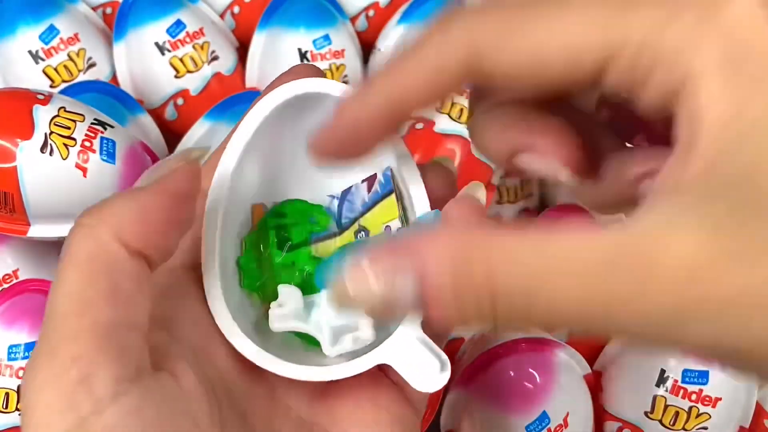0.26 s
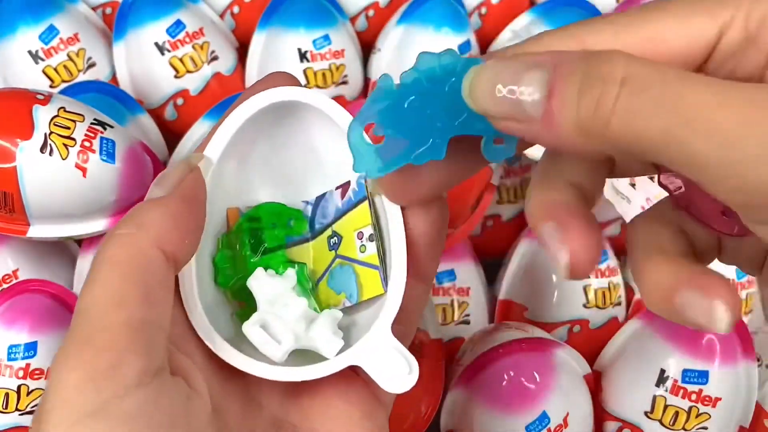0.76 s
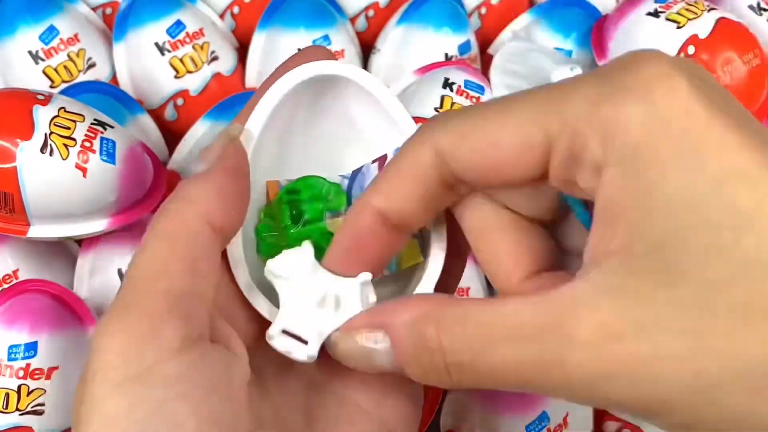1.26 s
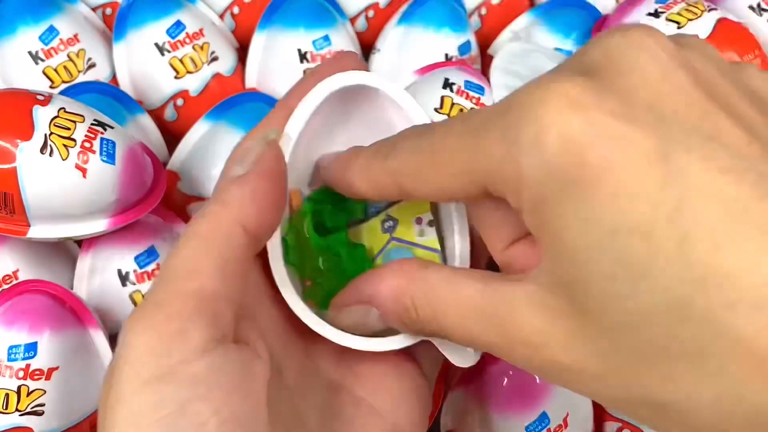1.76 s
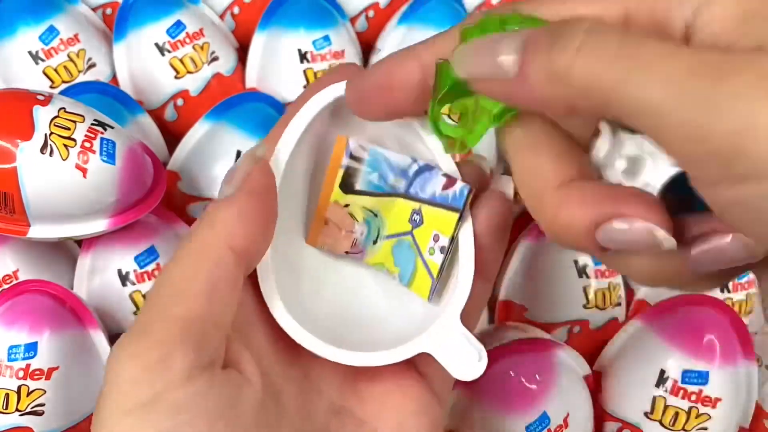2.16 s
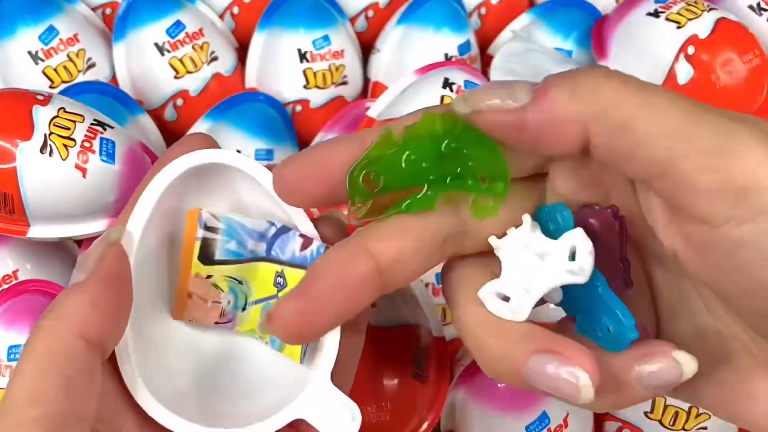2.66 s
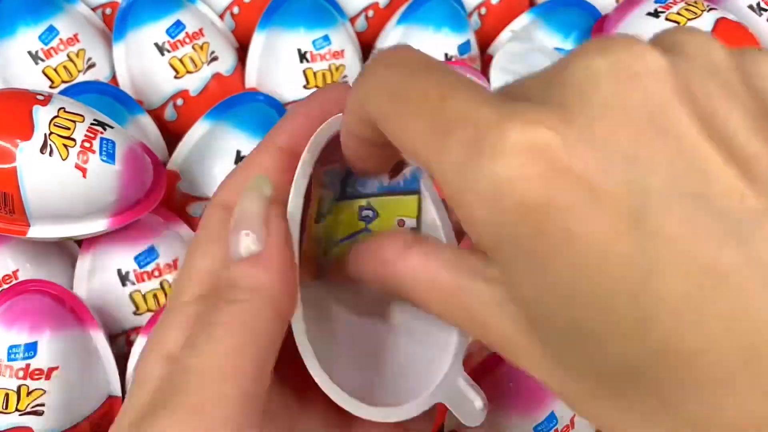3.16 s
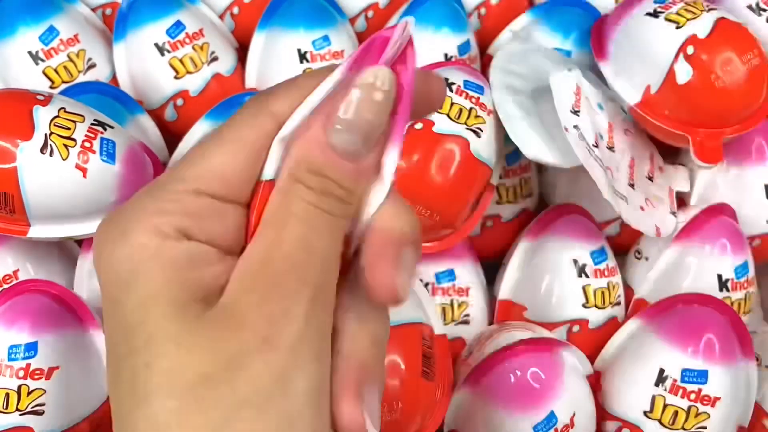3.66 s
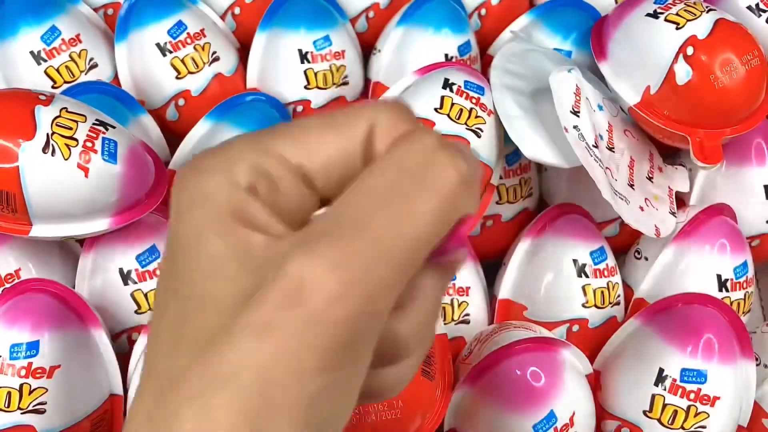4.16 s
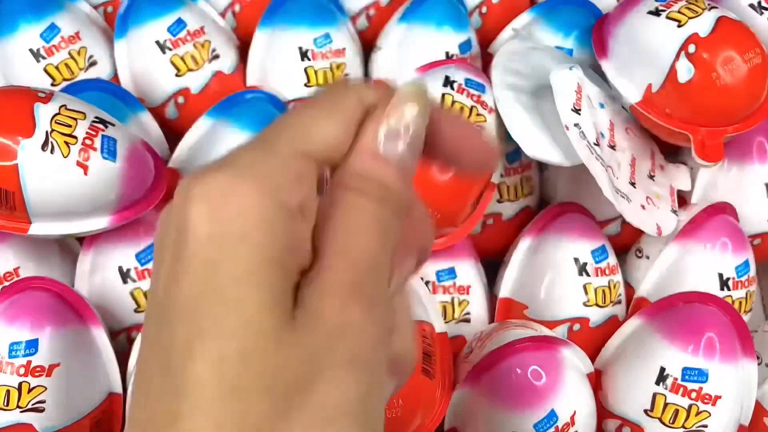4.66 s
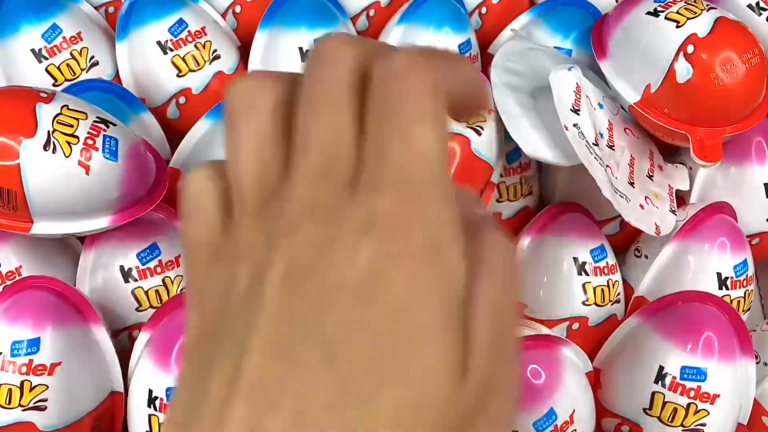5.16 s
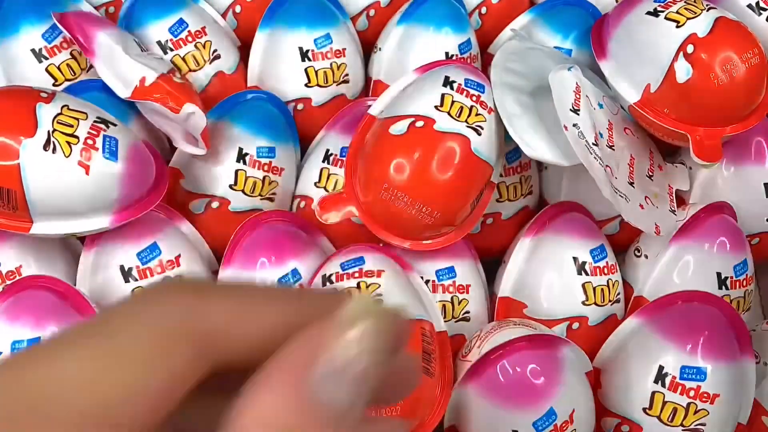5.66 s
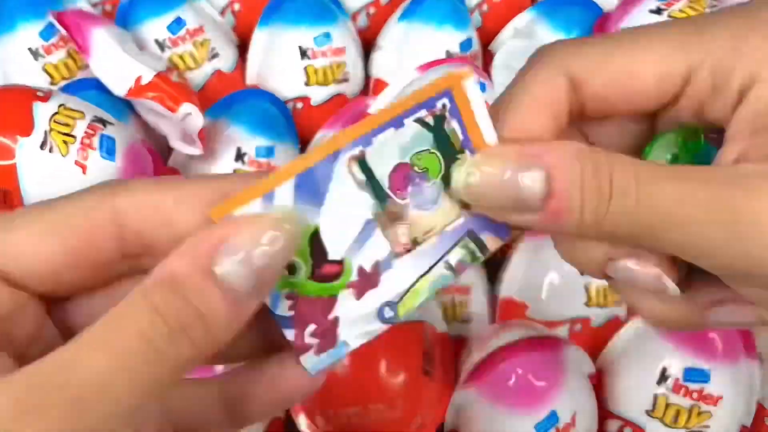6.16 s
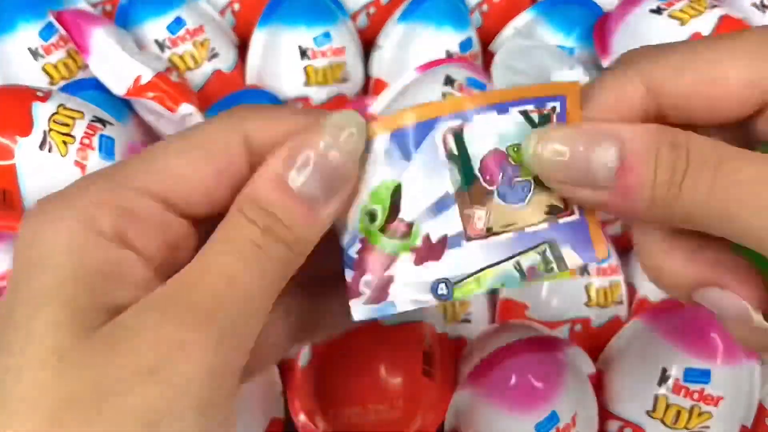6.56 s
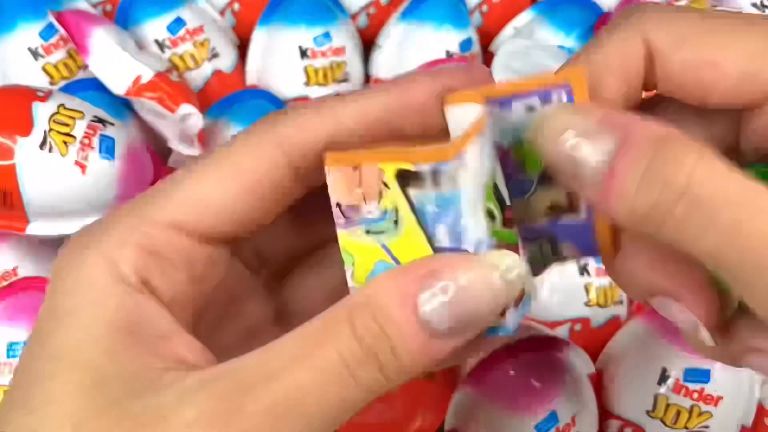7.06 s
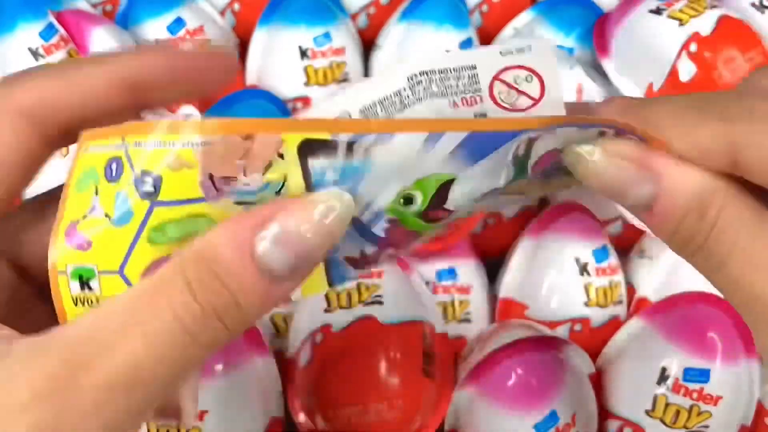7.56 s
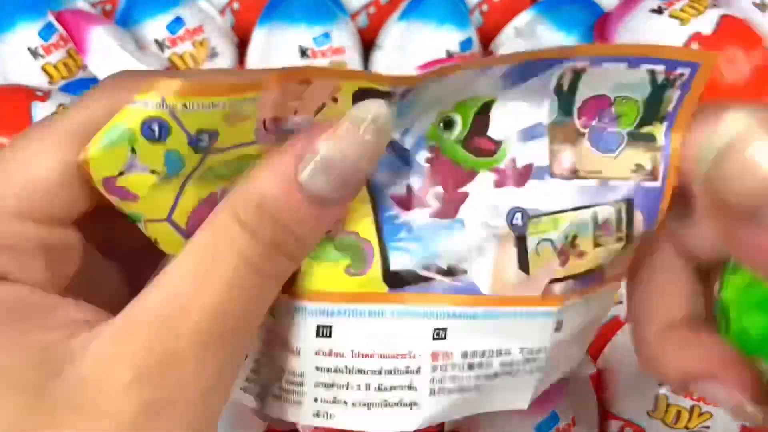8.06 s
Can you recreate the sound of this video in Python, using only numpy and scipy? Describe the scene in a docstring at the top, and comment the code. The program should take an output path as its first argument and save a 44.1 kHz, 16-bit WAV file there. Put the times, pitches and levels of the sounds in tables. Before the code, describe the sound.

Quiet plastic clicks and skin rubbing come first, with one sharper knock as little pieces leave a thin cup. A short papery rustle leads into bright cracks, pops and stuttering creaks as the cup is bent, then a hollow, clattery landing on other plastic shells. Dry paper crackles follow, sparse at first, then busier with soft flapping thumps. Close, dry indoor sound with faint room tone and low rumble.

```python
"""In a small room, close to the microphone, fingers pick little plastic toy parts out of a thin plastic egg half.
The empty half is squeezed until it creaks and snaps, then dropped among other eggs; a folded leaflet is opened.
Each contact is a dull knock, a short ring and a bright crack, all set off by a push and its fine chatter.
Between them skin, plastic and paper rub as coloured grains and hiss; soft puffs are damped low swings.
A short diffuse room tail, steady room tone and a low rumble lie behind."""
import sys
import numpy as np
from scipy import signal
from scipy.fft import rfft, irfft, next_fast_len
from scipy.io import wavfile

SR = 44100
rng = np.random.default_rng(int(sys.argv[2]) if len(sys.argv) > 2 else 0)


def to_wav(sig):
    """Store sig (one row per channel, or 1-D mono) as 16-bit WAV at the path in sys.argv[1].

    Samples outside -1..1 are clipped; the rate is SR.
    """
    pcm = np.clip(np.atleast_2d(sig), -1, 1) * 32767
    pcm = np.round(pcm).astype(np.int16)
    wavfile.write(sys.argv[1], SR, pcm.T)  # frames by channels


N = 366471
TIME = np.arange(N) / SR
CONTACT_TIME = np.arange(1024) / SR
CUTOFF_HZ = 16000
LEVEL_WINDOW_S = 0.005   # burst levels are stated as rms over this span

# colours of bending, scraping and hissing surfaces: pitch_hz, density_db (relative, per Hz)
BENDING_COLOUR = [(60, 3), (110, 2), (190, -0.5), (330, -6), (600, -0.5), (1100, -3.5), (1600, -15)]
SCRAPING_COLOUR = [(800, -17), (1250, -2), (2100, -1.5), (2900, -0.5), (3900, -16.5), (5200, -18.5)]
HISSING_COLOUR = [(2800, -10), (4400, -5), (5400, -5), (6500, -5.5), (9800, -0.5), (12500, -1),
                  (16000, -8.5)]


def from_db(db):
    """Decibels to gain."""
    return 10 ** (np.asarray(db) / 20)


def rms_one(x):
    """Scale to unit rms."""
    return x / np.sqrt(np.mean(x ** 2) + 1e-20)


def unit_burst(x):
    """Scale a burst to the energy of unit rms over the level window."""
    return x * np.sqrt(LEVEL_WINDOW_S * SR / (np.sum(x ** 2) + 1e-20))


def in_time(rows):
    """Each column of a curve at every sample."""
    s, *columns = np.transpose(rows)
    return [np.interp(TIME, s, column) for column in columns]


def at_hz(points, hz):
    """Read a table on a log-frequency axis."""
    f, value = np.transpose(points)
    return np.interp(np.log(hz + 1), np.log(f), value)


def colour(x, points):
    """Minimum-phase filter with the given spectrum, falling 20 dB an octave for two octaves past its ends."""
    size = next_fast_len(len(x) + 2048, True)
    hz = np.fft.rfftfreq(size, 1 / SR) + 1
    octaves_outside = np.abs(np.log2(hz / np.clip(hz, points[0][0], points[-1][0])))
    level_db = at_hz(points, hz) - 20 * np.minimum(octaves_outside, 2)
    # folding the cepstrum onto positive time makes the filter causal
    cepstrum = irfft(np.log(from_db(level_db)), size)
    cepstrum[1:size // 2] *= 2
    cepstrum[size // 2 + 1:] = 0
    response = np.exp(rfft(cepstrum))
    return irfft(rfft(x, size) * response, size)[:len(x)]


def ring(x, hz, t60):
    """One damped mode that falls 60 dB in t60 seconds."""
    r = 1000 ** (-1 / (t60 * SR))
    w = 2 * np.pi * hz / SR
    return signal.lfilter([1, 0, -1], [1, -2 * r * np.cos(w), r * r], x)


def soften(x, hz):
    """Second-order low-pass."""
    return signal.sosfilt(signal.butter(2, min(hz, SR / 2 - 1), fs=SR, output="sos"), x)


def add(out, s, sound):
    """Mix a sound in at a time."""
    i = int(np.clip(round(s * SR), 0, N - 1))
    out[i:i + len(sound)] += sound[:N - i]


def drift(per_s):
    """Smooth random wandering of unit rms."""
    knots = rng.standard_normal(4096)
    return rms_one(np.interp(TIME * per_s, np.arange(len(knots)), knots))


def contacts(rows, chatter, chatter_s, crack_s, knock_hz, knock_t60, lowest_hz):
    """A sudden push, then a few milliseconds of fine chatter while the surfaces settle."""
    # spectrum of the bright crack: pitch_hz, density_db (relative, per Hz)
    crack_colour = [(1500, -7), (3200, -5.5), (4600, 1), (6500, -4), (10000, 1), (13000, -4), (16000, -9)]
    # a second mode that rings half as long: times the ring's pitch, level [dB]
    overtone_ratio, overtone_db = 1.937, -14
    out, t = np.zeros(N), CONTACT_TIME
    # a small object hardly radiates its lowest frequencies
    low_cut = signal.butter(2, lowest_hz, "high", fs=SR, output="sos")
    for s, knock_db, ring_db, ring_hz, ring_t60, crack_db in rows:
        chatter_noise, crack_noise, grip_noise = rng.standard_normal((3, len(t)))
        settle = chatter * unit_burst(chatter_noise * np.exp(-(t / chatter_s) ** 2))
        impulse = unit_burst(1.0 * (t == 0))
        push = signal.sosfilt(low_cut, impulse + 0.93 * settle)

        # the grip changes the pitch of the knock from one touch to the next
        gripped_hz = knock_hz * np.exp(0.12 * grip_noise[0])
        knock = soften(ring(push, gripped_hz, knock_t60), 2300)

        main_mode = soften(ring(push, ring_hz, ring_t60), 1.2 * ring_hz)
        overtone = ring(push, min(overtone_ratio * ring_hz, CUTOFF_HZ), ring_t60 / 2)
        tone = unit_burst(main_mode) + from_db(overtone_db) * unit_burst(overtone)

        crack = colour(unit_burst(crack_noise * np.exp(-t / crack_s)) + settle, crack_colour)

        hit = from_db(knock_db) * unit_burst(knock)
        hit += from_db(ring_db) * unit_burst(tone)
        hit += from_db(crack_db) * unit_burst(crack)
        add(out, s, hit)
    return out


def toy_clinks():
    """Hard little toy parts touch: short high rings and cracks with almost no knock."""
    # touches, levels over 5 ms: start_s, ring_db, ring_hz, crack_db
    touches = [(0.953, -41, 4480, -40.5), (0.9653, -40, 9800, -35.5), (0.98, -38, 8900, -44),
               (1.546, -40.5, 10560, -46), (1.5642, -59, 3140, -55), (1.578, -36.5, 9630, -44.5),
               (1.606, -51, 9500, -53), (1.6432, -50, 8300, -50), (1.6598, -51, 6000, -51.5),
               (2.8213, -56, 3420, -57.5), (2.8445, -67, 9050, -50.5), (2.8903, -47, 11050, -66),
               (5.6651, -45.5, 7900, -41), (5.7124, -51, 2920, -61)]
    # too light to knock much, however hard they meet
    knock_db, ring_t60 = -67, 0.0061
    rows = [(s, knock_db, ring_db, hz, ring_t60, crack_db) for s, ring_db, hz, crack_db in touches]
    return contacts(rows, chatter=1.0, chatter_s=0.0032, crack_s=0.00017,
                    knock_hz=735, knock_t60=0.0021, lowest_hz=350)


def cup_snaps():
    """The thin cup is knocked or buckles; the grip sets the pitch and damping of its ring."""
    # snaps, levels over 5 ms: start_s, knock_db, ring_db, ring_hz, ring_t60_s, crack_db
    snaps = [(0.3176, -51, -46, 1890, .002, -53), (0.3479, -37, -48, 1540, .014, -41),
             (0.3816, -66, -42, 1800, .005, -45), (0.3941, -69, -45, 1660, .002, -42.5),
             (0.636, -66, -75, 1800, .004, -68), (1.1173, -57, -53, 1760, .005, -55),
             (1.1749, -52, -40.5, 2150, .002, -41), (1.2661, -39.5, -27.5, 2260, .004, -22.5),
             (1.7175, -59, -53, 1960, .003, -58.5), (1.7685, -70, -66, 2000, .004, -62),
             (1.8223, -46.5, -51, 1720, .002, -50), (2.3785, -81, -74.5, 2200, 0.0037, -66),
             (2.8756, -66, -47, 2450, .003, -39.5), (2.9369, -74, -53.5, 2450, .009, -43),
             (3.0262, -52, -45.5, 2030, .005, -43.5), (3.0936, -46.5, -51, 2290, .005, -58),
             (3.157, -49.5, -53, 2000, .004, -53), (3.1802, -59, -47, 1960, .005, -62),
             (3.2976, -67, -52, 2330, .003, -71), (3.5448, -44, -18.5, 2125, .032, -31),
             (3.5496, -67, -21.5, 1945, .016, -55), (3.5746, -44.5, -25.5, 1700, .006, -52),
             (3.6451, -53.5, -32, 3700, .0014, -41), (3.7074, -48, -51, 1470, .019, -53),
             (3.7995, -63.5, -39.5, 1400, .011, -51), (3.8791, -42.5, -25.5, 2360, .009, -29),
             (3.8959, -46, -16, 2570, 0.011, -27.5), (3.8997, -53.5, -15, 2800, .006, -20.5),
             (3.9359, -61.5, -41.5, 2570, .011, -47.5), (3.9581, -77, -38, 1950, .005, -48),
             (4.0194, -84, -44.5, 1840, .004, -74), (4.0285, -82, -39.5, 1830, .009, -80),
             (4.1654, -61.5, -39, 1950, .011, -47), (4.2254, -57, -46, 2790, .008, -45),
             (4.2846, -66.5, -21.5, 2200, .0065, -31.5), (4.3312, -49, -37.5, 2860, .008, -43.5),
             (4.3496, -52.5, -35, 1980, .006, -55.5), (4.4759, -29, -19.5, 2470, .006, -18.5),
             (4.478, -43.5, -29, 2200, .012, -19.5), (4.4812, -46, -27.5, 2620, .005, -30),
             (4.5853, -69, -49, 2840, .005, -62), (4.691, -63, -49.5, 2320, .003, -63),
             (4.7911, -79, -37.5, 2530, .004, -36.5), (4.8527, -54.5, -42.5, 1720, .008, -48),
             (5.015, -77, -46.5, 1550, .002, -56), (5.0632, -78, -44.5, 1810, .015, -47.5),
             (5.1008, -69, -24, 3580, 0.0024, -42.5), (5.1315, -47.5, -39.5, 2380, .003, -39.5),
             (5.2475, -62.5, -19, 3020, 0.0017, -32.5), (5.2582, -38.5, -28, 2740, .0016, -34),
             (5.282, -27, -23.5, 1910, .003, -25), (5.3302, -43.5, -37, 1780, .011, -41),
             (5.3648, -46.5, -57, 1950, .002, -52), (5.4339, -50, -44, 2320, .01, -53),
             (5.4756, -52, -43.5, 2240, .01, -57.5)]
    return contacts(snaps, chatter=0.74, chatter_s=0.003, crack_s=0.0003,
                    knock_hz=631, knock_t60=0.005, lowest_hz=290)


def creaking(jitter, uneven_db, wall_t60):
    """Under pressure the scrape locks into nearly regular slips that ring the cup wall."""
    # stick-slip runs: start_s, length_s, slips_per_s, ring_hz, level_db
    creaks = [(3.763, 0.041, 480, 1490, -52), (4.03, 0.024, 240, 1490, -54.5),
              (4.128, .045, 287, 2070, -47.5), (4.182, 0.02, 360, 2720, -42),
              (4.205, 0.022, 430, 2000, -48), (4.724, 0.03, 650, 3640, -49),
              (5.024, 0.027, 160, 1500, -57.5), (5.056, 0.043, 230, 1900, -59.5)]
    out = np.zeros(N)
    for start, length, per_s, hz, db in creaks:
        gaps, sizes = rng.standard_normal((2, 64))
        at = np.cumsum(np.exp(jitter * gaps)) / per_s - 1 / (2 * per_s)
        inside = (at >= 0) & (at < length)
        slips = np.zeros(int(length * SR) + 256)   # room for the last ring to die
        slips[(at[inside] * SR).astype(int)] = from_db(uneven_db * sizes[inside])
        creak = soften(ring(slips, hz, wall_t60), 0.9 * hz)
        add(out, start, from_db(db) * rms_one(creak))
    return out


def shifting_body(x, hold_s, body_db, body_s):
    """The piece rings for a few milliseconds, and its many small resonances shift with each new grip."""
    hop = int(hold_s * SR)
    out, t = np.zeros(N), CONTACT_TIME
    # overlapping spans cross-fade from one random body to the next
    for start in range(-hop, N, hop):
        span = np.arange(max(start, 0), min(start + 2 * hop, N))
        fade = np.sin(np.pi * (span - start) / (2 * hop))
        direct = unit_burst(1.0 * (t == 0))
        resonances = unit_burst(rng.standard_normal(len(t)) * np.exp(-t / body_s))
        body = direct + from_db(body_db) * resonances
        add(out, span[0] / SR, signal.fftconvolve(x[span] * fade, body))
    return out


def friction(spectrum, grains_per_s, spread_db, smooth, grip):
    """Tiny slips of uneven size over a smooth hiss; both swell when the grip tightens."""
    sizes = from_db(spread_db * np.minimum(rng.exponential(1, N), 3.5)) * rng.choice([-1, 1], N)
    grains = rms_one(sizes * (rng.random(N) < grains_per_s / SR))
    slips = (grains + smooth * rng.standard_normal(N)) * grip
    rung = shifting_body(slips, hold_s=0.14, body_db=-1, body_s=0.0011)
    return rms_one(colour(rung, spectrum))


def strokes(rows, flex_db, flex_per_bright):
    """Gains of flex, scrape and hiss: a stroke builds up, holds and dies away; brightness sets its balance."""
    attack_s, release_s = 0.011, 0.012
    gains = np.zeros((3, N))
    for start, length, db, bright in rows:
        t = np.arange(int((length + 6 * release_s) * SR)) / SR
        swell = np.minimum(t / attack_s, 1) * np.exp(-np.maximum(t - length, 0) / release_s)
        offsets_db = (flex_db - flex_per_bright * bright, 0, bright)
        for layer, layer_db in zip(gains, offsets_db):
            add(layer, start, from_db(db + layer_db) * swell)
    return gains


def plastic_rubbing():
    """Skin and toy parts rub the cup: its wall flexes, its surface scrapes and hisses."""
    # loose parts slide in the cup, or the cup over the eggs: start_s, length_s, scrape_level_db, brightness_db
    slides = [(0.18, .025, -66.5, 2.5), (0.312, 0.042, -61, 0.5), (0.368, 0.046, -52, -1.5),
              (0.49, 0.092, -82, 10.5), (0.625, 0.02, -71, -4), (0.928, 0.056, -74.5, 23),
              (1.103, 0.047, -60, -4), (1.172, 0.13, -64.5, -0.5), (1.262, 0.023, -60, 6),
              (1.708, 0.026, -65, 2), (1.9, 0.048, -57, 0), (2.015, .04, -71, 9.5), (2.095, 0.03, -68.5, 5),
              (5.25, 0.043, -44, -3), (5.31, 0.064, -57.5, -6), (5.402, 0.093, -53, -8.5)]
    # fingers drag over the tightly held cup: start_s, length_s, scrape_level_db, brightness_db
    drags = [(1.55, 0.13, -74, 6), (2.81, 0.16, -72, 0.5), (2.87, 0.013, -64.5, 9), (3.36, 0.052, -49, 5.5),
             (3.55, 0.05, -43.5, -1.5), (3.64, 0.086, -58, -2), (3.808, 0.089, -60.5, 4),
             (3.898, 0.025, -51.5, -7), (4.14, 0.076, -54, -3.5), (4.295, .05, -53.5, -7),
             (4.425, 0.057, -57, 6), (4.478, 0.065, -65.5, 7), (4.585, 0.04, -59, 8.5),
             (4.71, 0.057, -53.5, 4), (4.788, 0.042, -59, -2), (5.045, 0.093, -62.5, 5),
             (5.122, 0.025, -52, 3)]
    # faint skin contact while things are held: time_s, scrape_level_db
    holding = [(0, -83), (1.5, -87.5), (1.8, -68.5), (2.2, -83.5), (2.75, -92.5), (3.2, -63), (3.48, -82),
               (4.65, -66.5), (4.92, -74), (5.6, -80.5), (6.5, -70), (6.95, -83.5), (7.3, -66), (8.31, -68)]
    held_db, = in_time(holding)
    held = from_db(held_db) * from_db([[-3], [0], [3]])   # flex, scrape, hiss
    gains = strokes(slides, flex_db=-3, flex_per_bright=0.45)
    gains += strokes(drags, flex_db=-14, flex_per_bright=-0.2)
    grip = from_db(2.2 * drift(110))
    flex = friction(BENDING_COLOUR, grains_per_s=600, spread_db=6.5, smooth=0.35, grip=grip)
    scrape = friction(SCRAPING_COLOUR, grains_per_s=260, spread_db=2.5, smooth=0.61, grip=grip)
    hiss = friction(HISSING_COLOUR, grains_per_s=4200, spread_db=6.0, smooth=0.8, grip=grip)
    return np.sum(np.hypot(gains, held) * [flex, scrape, hiss], axis=0)


def eggs(cup):
    """The hollow eggs under the fallen cup pick up its sound in one low resonance."""
    from_s, until_s = 5.24, 7
    egg_hz, egg_t60, egg_db = 590, 0.076, 4
    touching = cup * ((TIME > from_s) & (TIME < until_s))
    gain_at_peak = egg_t60 * SR / np.log(1000)
    return from_db(egg_db) * ring(touching, egg_hz, egg_t60) / gain_at_peak


def cascade(rows, spread_s, weaker_db, count):
    """A crease never buckles alone: weaker snaps at other pitches crowd round each main one."""
    # every crease rings near this pitch
    crease_hz, crease_t60, pitch_octaves = 2200, 0.0042, 0.24
    snaps = []
    for s, knock_db, ring_db, crack_db in rows:
        ring_hz = crease_hz * 2 ** (pitch_octaves * rng.standard_normal())
        snaps.append((s, knock_db, ring_db, ring_hz, crease_t60, crack_db))
        for when, size, pitch in rng.standard_normal((count, 3)):
            less = weaker_db + 2 * size
            snaps.append((s + spread_s * when, knock_db + less, ring_db + less,
                          ring_hz * 2 ** (pitch / 2), crease_t60 / 2, crack_db + less))
    return snaps


def paper_snaps():
    """Creases of the leaflet buckle in small clusters of dry snaps."""
    # main snaps, levels over 5 ms: start_s, knock_db, ring_db, crack_db
    creases = [(5.794, -54.5, -46, -39), (6.0368, -46, -48.5, -42), (6.3138, -75, -70, -48.5),
               (6.49, -48, -48.5, -45), (6.549, -51, -47, -45), (6.5606, -52, -44, -38.5),
               (6.5725, -37.5, -41.5, -60), (6.8127, -42, -67, -38.5), (7.024, -49.5, -58, -49.5),
               (7.0579, -52, -61, -44), (7.0707, -50, -40.5, -59), (7.1095, -60, -48, -47),
               (7.175, -64, -57, -54), (7.2336, -43, -57, -41), (7.2582, -69, -62, -49),
               (7.294, -48.5, -45.5, -41.5), (7.346, -40.5, -38, -37), (7.4609, -65, -45.5, -38),
               (7.5551, -44.5, -47, -50), (7.6263, -44.5, -40.5, -74), (7.672, -39, -55, -66),
               (7.7175, -49, -49, -49), (7.74, -38, -38.5, -53), (7.779, -37.5, -42.5, -54),
               (7.8127, -67, -36, -56), (7.8263, -41, -38, -54), (7.8521, -39.5, -42.5, -35),
               (7.8575, -42.5, -45.5, -51), (7.953, -38.5, -37, -54), (7.9939, -54, -46, -34.5),
               (8.029, -47, -55, -36), (8.068, -58, -46.5, -40.5), (8.1747, -29.5, -34, -34),
               (8.1853, -41, -43, -45), (8.1979, -34.5, -38, -32.5), (8.2231, -43, -46, -52),
               (8.2573, -46, -40, -39), (8.2972, -53, -46, -41)]
    crinkles = cascade(creases, spread_s=0.0092, weaker_db=-16, count=2)
    return contacts(crinkles, chatter=0.73, chatter_s=0.0037, crack_s=0.00038,
                    knock_hz=580, knock_t60=0.0026, lowest_hz=86.3)


def crackle(per_s, spread_db, cycles, low_hz, high_hz, count):
    """Single fibres and tiny creases give way, each with a dry tick at one of several pitches."""
    sizes = from_db(spread_db * np.minimum(rng.exponential(1, N), 2.5)) * rng.choice([-1, 1], N)
    ticks = sizes * (rng.random(N) < per_s / SR)
    dealt = rng.integers(0, count, N)   # which pitch each tick gets
    out = np.zeros(N)
    for k, hz in enumerate(np.geomspace(low_hz, high_hz, count)):
        out += rms_one(ring(ticks * (dealt == k) + 1e-18, hz, cycles / hz))
    return rms_one(out)


def paper_rubbing():
    """The leaflet bends with sparse dry ticks while its faces hiss over each other."""
    # paper slides on paper and skin: start_s, length_s, base_level_db, brightness_db
    rustles = [(3.015, 0.03, -57.5, 6), (3.06, .12, -58, 6.5), (3.195, 0.046, -59.5, 9.5),
               (3.26, 0.051, -71.5, 4), (5.855, 0.028, -59, 5), (5.91, 0.042, -65.5, 12.5),
               (6.022, 0.016, -59, 12.5), (6.078, 0.023, -59.5, 1), (6.148, 0.028, -61, 1.5),
               (6.22, 0.085, -68.5, 1), (6.305, 0.046, -63.5, 9), (6.39, 0.17, -71, 0),
               (6.553, 0.029, -48.5, 7), (6.615, 0.073, -56.5, 5), (6.797, 0.036, -52.5, -0.5),
               (7.0, 0.017, -58.5, -4), (7.048, 0.019, -53, -0.5), (7.1, 0.082, -60, 3.5),
               (7.222, 0.063, -54.5, 1), (7.318, 0.07, -56.5, 4), (7.438, 0.03, -51, 0),
               (7.54, 0.01, -48.5, -4), (7.605, 0.13, -62.5, 0), (7.703, 0.089, -56.5, -4),
               (7.84, 0.0087, -50, 3), (7.88, 0.17, -64, 5), (7.985, 0.079, -51, 1.5), (8.1, .06, -60, 4),
               (8.16, 0.062, -52, 4.5), (8.23, 0.14, -60.5, -12)]
    grip = from_db(4.7 * drift(80))
    flex = friction(BENDING_COLOUR, grains_per_s=300, spread_db=8.0, smooth=0.55, grip=grip)
    scrape = friction(SCRAPING_COLOUR, grains_per_s=430, spread_db=5.0, smooth=0.93, grip=grip)
    hiss = friction(HISSING_COLOUR, grains_per_s=1000, spread_db=2.5, smooth=0.79, grip=grip)
    ticks = crackle(per_s=190, spread_db=6, cycles=4.5, low_hz=556, high_hz=6000, count=10)
    layers = [from_db(-2.5) * flex, from_db(-0.5) * scrape + from_db(-5.0) * ticks, hiss]
    return np.sum(strokes(rustles, flex_db=2, flex_per_bright=0.58) * layers, axis=0)


def puffs(cycles):
    """A broad surface swings a few times and pushes the air, falling 60 dB in the given cycles."""
    # the sheet flaps or the cup lands, levels over 5 ms: start_s, level_db, pitch_hz
    pushes = [(3.166, -47, 79.4), (5.252, -42, 175), (5.281, -46, 150.6), (6.181, -56, 210),
              (6.573, -41, 200), (6.816, -53, 149), (7.786, -42, 92.5), (7.857, -38, 100),
              (8.166, -39, 264), (8.199, -36.5, 153)]
    out, t = np.zeros(N), np.arange(SR // 8) / SR
    for s, db, hz in pushes:
        swing = np.sin(2 * np.pi * hz * t) * 1000 ** (-t * hz / cycles)
        add(out, s, from_db(db) * unit_burst(swing))
    return out


def room(x, wet_db, first_echo_s):
    """A diffuse noise tail fades in after the first echo time; each band dies at its own rate."""
    # how long the room rings: pitch_hz, t60_s
    decay = [(200, 0.053), (1000, 0.21), (4000, 0.18), (9000, 0.11), (16000, 0.24)]
    wall_colour = [(200, 7.5), (2500, -4.0), (5000, 5.0), (12000, -16)]   # pitch_hz, level_db
    t = np.arange(SR // 2) / SR
    edges, tail = np.geomspace(120, 17000, 9), np.zeros(len(t))
    for low, high in zip(edges, edges[1:]):
        band_pass = signal.butter(2, [low, high], "band", fs=SR, output="sos")
        band = signal.sosfilt(band_pass, rng.standard_normal(len(t)))
        hz = np.sqrt(low * high)
        tail += from_db(at_hz(wall_colour, hz)) * band * 1000 ** (-t / at_hz(decay, hz))
    tail *= np.clip(t / first_echo_s - 1, 0, 1)
    return from_db(wet_db) * signal.fftconvolve(x, tail / np.sqrt(np.sum(tail ** 2)))[:N]


def background():
    """Steady room tone and a low rumble that follows the moving hands."""
    # the hands stir the air at the microphone: time_s, level_db
    stirring = [(0, -58.5), (2.9, -59.5), (3.1, -55.5), (4.5, -55), (4.79, -48), (5.0, -55.5), (7.0, -59),
                (7.7, -52.5), (7.8, -51.5), (8.31, -55.5)]
    # spectra of the rumble and of the room tone: pitch_hz, density_db (relative, per Hz)
    rumble_colour = [(20, 4.5), (35, -9), (70, -17), (120, -24), (250, -37)]
    floor_colour = [(60, -1), (130, -5.5), (250, -7.5), (390, -9), (440, -5.5), (520, -12.5), (700, -12),
                    (1600, -18.5), (5000, -22), (16000, -25.5)]
    floor_db = -71
    rumble_db, = in_time(stirring)
    rumble = from_db(rumble_db) * rms_one(colour(rng.standard_normal(N), rumble_colour))
    room_tone = from_db(floor_db) * rms_one(colour(rng.standard_normal(N), floor_colour))
    return rumble + room_tone


def scene():
    """Toy parts, cup and leaflet in the room."""
    toys = toy_clinks()
    cup = cup_snaps() + plastic_rubbing() + creaking(jitter=0.16, uneven_db=2.5, wall_t60=0.0045)
    paper = paper_snaps() + paper_rubbing()
    hands = toys + cup + eggs(cup) + paper + puffs(cycles=4.6)
    return (hands + room(hands, wet_db=-22.5, first_echo_s=0.0037) + background())[None]


def record(dry):
    """The loudest snaps are rounded a little; the top is cut steeply."""
    rounded = 0.75 * np.tanh(dry / 0.75)
    return signal.sosfilt(signal.ellip(10, 0.1, 80, CUTOFF_HZ, fs=SR, output="sos"), rounded)


dry = scene()
out = record(dry)
to_wav(out)
```